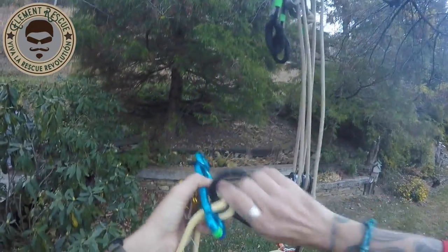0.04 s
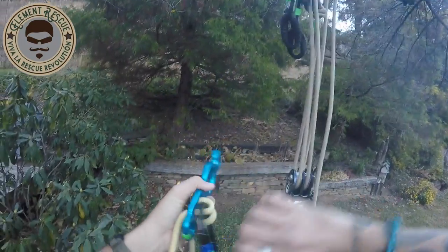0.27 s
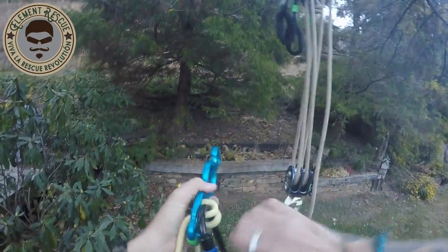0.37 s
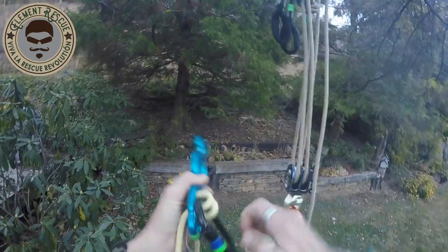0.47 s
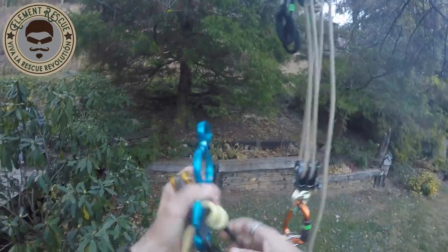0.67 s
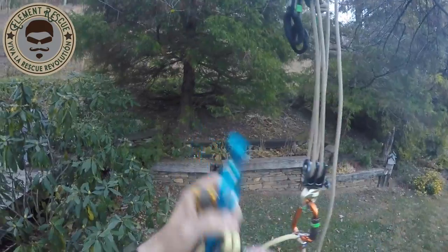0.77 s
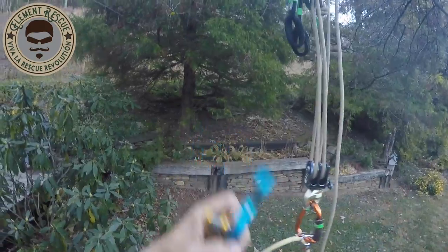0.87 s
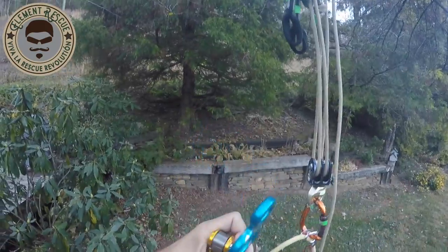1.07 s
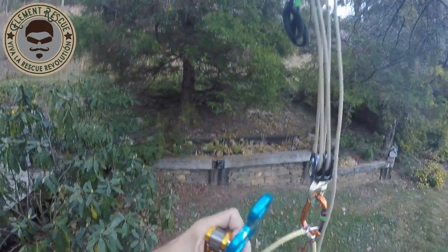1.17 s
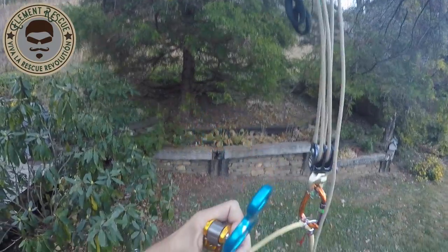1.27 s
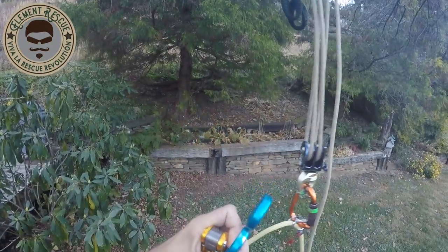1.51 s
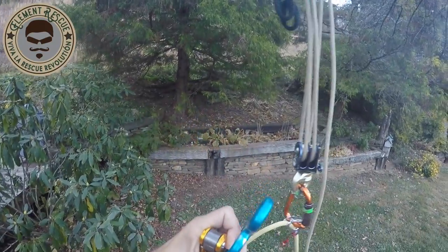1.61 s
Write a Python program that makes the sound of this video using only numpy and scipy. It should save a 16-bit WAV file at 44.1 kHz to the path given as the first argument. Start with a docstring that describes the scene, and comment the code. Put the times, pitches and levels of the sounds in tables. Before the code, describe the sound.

Sharp metallic carabiner snap, followed by smaller clinks and a dull clack, over faint rope rustle

```python
"""A carabiner's gate scrapes and snaps shut; the carabiner then knocks on a hand-held metal rope device.
Each strike superposes an impulsive tick, decaying noise and damped sinusoidal modes of the struck part.
Friction adds scrapes, squeaks and squeals; a weak scatter of decaying noise follows all the metal.
Filtered noise gives the rope's rustle and rasps, soft handling bumps, quiet outdoor air and a low
microphone rumble; a very faint pulsed whine comes from the camera's electronics."""
import sys
import numpy as np
from scipy import signal
from scipy.fft import rfft, irfft
from scipy.io import wavfile
from scipy.ndimage import uniform_filter1d

SR = 44100
rng = np.random.default_rng(int(sys.argv[2]) if len(sys.argv) > 2 else 0)


def bounce(signal):
    """Save signal as a 16-bit WAV file at the path given by the first command-line argument."""
    frames = np.transpose(np.atleast_2d(signal))
    limited = np.clip(frames, -1, 1)
    pcm = np.round(limited * 32767).astype(np.int16)
    wavfile.write(sys.argv[1], SR, pcm)


N = 72765  # samples


# Gate contacts, glancing then seating: t/s, crack level/dB, ring level/dB, treble tilt/(dB per octave),
# contact time/s, favoured f/Hz, tick level/dB
GATE_CONTACTS = [(.2486, -16.5, -35.5, -0.5, 0.0023, 9260, -25), (.2550, -13, -8.5, 0, 0.0012, 10680, -19)]
# Modes of the carabiner: f/Hz, level/dB, t60/s
CARABINER_MODES = [(600, -27.5, 0.02244), (744, -29.5, 0.035), (1200, -25, 0.03), (1513, -23, 0.025),
                   (1806, -28, 0.029), (2144, -20.5, 0.025), (2850, -20, 0.035), (3170, -20.5, .024),
                   (3630, -16.5, .026), (4090, -9.5, 0.02), (4250, -15, 0.025), (4500, -24, 0.012),
                   (4800, -9.5, 0.013), (5240, -14.5, 0.022), (7670, -35, .06), (8300, -23, .028),
                   (10600, -20, 0.033), (10870, -24, 0.021), (10800, -18, .04), (11500, -29, .032),
                   (12850, -23, .045), (12700, -35, .04)]
# Spectrum of the snap's crack: f/Hz, level/dB
SNAP_SPECTRUM = [(150, -35.5), (550, -18.5), (2000, -12), (3500, -11.5), (4200, 2.5), (5300, -18.5),
                 (6000, -7.5), (7300, -12), (8300, -0.5), (9700, -8), (10800, 2.5), (13200, 0.5),
                 (13850, -10), (14700, 2), (15400, -9.5)]


def gate_snaps():
    """Impact excitation: the closing gate sets the carabiner's modes ringing."""
    return strikes(GATE_CONTACTS, CARABINER_MODES, SNAP_SPECTRUM,
                   crack_t60_s=0.0093, wash_db=-17, wash_t60_s=0.075)


# Carabiner against rope device: t/s, crack level/dB, ring level/dB, treble tilt/(dB per octave),
# contact time/s, favoured f/Hz, tick level/dB
DEVICE_CONTACTS = [(.3439, -30, -28.5, 3.5, 0.00063, 5670, -31), (.4092, -64, -55.5, 3, 0.0009, 5460, -75),
                   (.6363, -30.5, -32.5, 3, 0.00092, 5050, -31),
                   (.6447, -36, -34.5, 3.5, 0.0012, 4460, -60),
                   (.8181, -48, -47.5, -0.5, 0.00087, 5600, -63), (.8893, -57, -57, -5, .003, 3820, -67),
                   (.9025, -59.5, -67, -3, 0.0017, 3800, -68)]
# Modes of the rope device: f/Hz, level/dB, t60/s
DEVICE_MODES = [(2700, -14, .018), (3135, -6, .03), (3390, -10, .033), (4295, -11, .02), (4595, -13, .075),
                (5110, -6, .02), (5470, -6, .022), (5485, -21, .085), (7526, -14, .034), (8040, -20, .085),
                (9120, -24, .03), (11350, -28, .05), (12960, -25, .04), (14640, -24, .025)]
# Spectrum of a knock's crack: f/Hz, level/dB
KNOCK_SPECTRUM = [(200, -26), (1000, -5.5), (1500, -6.5), (2000, -5.5), (2700, 0.5), (3700, -16), (4500, 5),
                  (5600, 0.5), (6900, -18.5), (7700, -5), (9000, -7), (10500, -16.5), (11400, -10.5),
                  (13000, -16), (14800, -19), (15500, -34)]


def device_knocks():
    """Impact excitation: the carabiner's blows set the rope device's modes ringing."""
    return strikes(DEVICE_CONTACTS, DEVICE_MODES, KNOCK_SPECTRUM,
                   crack_t60_s=0.019, wash_db=-31, wash_t60_s=0.074)


# Dull clacks of the side plate: t/s, crack level/dB, ring level/dB, treble tilt/(dB per octave),
# contact time/s, favoured f/Hz, tick level/dB
PLATE_CONTACTS = [(.7636, -35, -32, 0, .0007, 5650, -30), (.7665, -41, -39, -2, .001, 1250, -42)]
# Modes of the side plate, damped by the hand: f/Hz, level/dB, t60/s
PLATE_MODES = [(830, -14.5, 0.029), (1007, -2.5, 0.0071), (1264, -10.5, 0.031), (1810, -14, 0.022),
               (2110, -9.5, 0.016), (3325, -14.5, 0.041), (5600, -6, 0.0091), (6070, -2, 0.016)]
# Spectrum of a clack's crack: f/Hz, level/dB
CLACK_SPECTRUM = [(250, -22), (550, -12), (1200, 0), (2600, -17), (4300, -6), (5800, -2.5), (7000, -23),
                  (8600, -3), (12000, -12.5), (14600, -7), (15400, -20)]


def plate_clacks():
    """Damped modal response: the hand-held side plate clacks with short-lived modes."""
    return strikes(PLATE_CONTACTS, PLATE_MODES, CLACK_SPECTRUM,
                   crack_t60_s=0.016, wash_db=-16, wash_t60_s=0.081)


# Wash of dense high modes, which outlast the low ones: f/Hz, level/dB
WASH_SPECTRUM = [(500, -12), (1500, -18), (4500, -1.5), (6500, -3), (8000, -2), (10000, -5.5), (12300, 1.5),
                 (14000, -8), (15400, -7)]
RISE_S = 0.00023


def strikes(contacts, modes, spectrum, crack_t60_s, wash_db, wash_t60_s):
    """Superposition at impact: tick, crack of chattering faces, wash of dense modes, and main modes."""
    out = np.zeros(N)
    t = np.arange(8192) / SR
    bins = np.fft.rfftfreq(len(t), 1 / SR)
    for s, crack_db, ring_db, tilt_db, contact_s, favoured_hz, tick_db in contacts:
        chatter, dense = rng.standard_normal((2, len(t)))
        contact_spectrum = read(spectrum, bins) + emphasis(bins, tilt_db, favoured_hz)
        # The crack holds level during contact, then decays
        crack = shaped(chatter, contact_spectrum) * fade(t - contact_s, crack_t60_s)
        wash = shaped(dense, read(WASH_SPECTRUM, bins)) * fade(t, wash_t60_s)
        ring = np.zeros(len(t))
        for k, (hz, db, t60_s) in enumerate(modes):
            sign = (-1) ** k  # neighbouring modes start in opposite phase
            gain = amp(db + emphasis(hz, tilt_db, favoured_hz))
            ring += sign * gain * fade(t, t60_s) * np.sin(2 * np.pi * hz * t)
        onset = np.minimum(t / RISE_S, 1)
        noise_part = amp(crack_db) * (crack + amp(wash_db) * wash)
        add(out, s, onset * (noise_part + amp(ring_db) * ring))
        add(out, s + RISE_S, amp(tick_db) * tick(contact_spectrum))
    return out


FAVOUR_DB, FAVOUR_WIDTH_HZ = 6.5, 300


def emphasis(hz, tilt_db, favoured_hz):
    """Selective excitation: each contact point tilts the spectrum and favours one region, in dB."""
    octaves = np.log2(np.maximum(hz, 500) / 6000)  # the tilt pivots at 6 kHz and is flat below 500 Hz
    favour = np.exp(-((hz - favoured_hz) / FAVOUR_WIDTH_HZ) ** 2)
    return tilt_db * octaves + FAVOUR_DB * favour


def tick(gain_db):
    """Minimum-phase impulse: the given spectrum's energy arrives as early as possible; peak 1."""
    two_sided_db = np.concatenate([gain_db, gain_db[-2:0:-1]])
    log_gain = np.log(amp(two_sided_db))
    # The Hilbert transform of the log gain gives the minimum phase
    response = np.exp(np.conj(signal.hilbert(log_gain)))
    pulse = irfft(response[:len(gain_db)])
    return pulse / np.max(abs(pulse))


# Gate sliding on metal: t/s, Gaussian decay time/s, rasp level/dB, squeak level/dB
GATE_SLIPS = [(0.2185, 0.0056, -44, -45), (.2240, .004, -44.5, -54), (0.2283, .006, -43, -38.5),
              (0.2324, 0.0045, -51, -35.5)]
# Spectrum of the gate's rasp: f/Hz, level/dB
SCRAPE_SPECTRUM = [(300, -22), (1350, 9.5), (2000, -3), (5000, -3), (6500, -19), (8200, -8.5), (10000, 3),
                   (12500, -7), (15000, 1.5)]
SQUEAK_HZ, SQUEAK_T60_S, SCRAPE_RISE_S = 4850, 0.014, 0.0006


def gate_scrapes():
    """Sliding friction: each short slip of the gate gives a noise rasp and a decaying squeak."""
    out = np.zeros(N)
    t = np.arange(2048) / SR
    onset = np.minimum(t / SCRAPE_RISE_S, 1)
    for s, length_s, db, squeak_db in GATE_SLIPS:
        rasp = amp(db) * noise(SCRAPE_SPECTRUM, len(t)) * np.exp(-(t / length_s) ** 2)
        squeak = amp(squeak_db) * np.sin(2 * np.pi * SQUEAK_HZ * t) * fade(t, SQUEAK_T60_S)
        add(out, s, onset * (rasp + squeak))
    return out


# Metal rubbing before the next strike: t/s, length/s, f/Hz, peak level/dB
METAL_SQUEALS = [(.588, 0.04, 6700, -74), (0.689, 0.07, 6320, -66.5)]
SQUEAL_WANDER_HZ = 25.1


def squeals():
    """Frictional oscillation: rubbing metal gives thin tones of slightly unsteady pitch."""
    out = np.zeros(N)
    for s, length_s, hz, db in METAL_SQUEALS:
        u = np.arange(0, length_s, 1 / SR) / length_s
        pitch = hz + SQUEAL_WANDER_HZ * drift(N, count=200)[:len(u)]
        swell = np.sin(np.pi * u ** 2) ** .5  # swells slowly, peaks late
        add(out, s, amp(db) * swell * np.sin(2 * np.pi * np.cumsum(pitch) / SR))
    return out


ECHO_DB, ECHO_T60_S, ECHO_DELAY_S = -33, 0.36, 0.006


def yard(x):
    """Diffuse scattering: ground and bushes return a weak, delayed, exponentially decaying tail."""
    t = np.arange(SR // 2) / SR
    arrival = np.clip(t / ECHO_DELAY_S - 1, 0, 1)  # silent for one delay, then grows over another
    tail = rng.standard_normal(len(t)) * fade(t, ECHO_T60_S) * arrival
    return amp(ECHO_DB) * signal.fftconvolve(x, tail / np.linalg.norm(tail))[:N]


# Rope sliding through the hand: t/s, level/dB
ROPE_LEVEL = [(0, -66.5), (0.151, -63.5), (.3, -69), (.45, -64.5), (.58, -66.5), (.85, -62.5), (1.15, -67),
              (1.32, -67), (1.42, -62.5), (1.52, -63), (1.65, -60.5)]
# Spectrum of the rope's rustle: f/Hz, level/dB
ROPE_SPECTRUM = [(100, -23), (220, -2.5), (340, 3.5), (480, -1), (700, 1), (1050, -2), (1400, -25),
                 (5000, -12.5), (15000, -71)]
ROPE_GRAIN_DB = 1.5


def rope():
    """Amplitude-modulated friction noise: the sliding sheath gives a soft, grainy rustle."""
    level_db = np.interp(np.arange(N) / SR, *np.transpose(ROPE_LEVEL))
    grain = amp(ROPE_GRAIN_DB * drift(N, count=200))
    return amp(level_db) * unit(noise(ROPE_SPECTRUM, N) * grain)


# Rope settling against the metal: t/s, Gaussian decay time/s, level/dB
ROPE_RASPS = [(0.29, 0.02, -61), (.3135, 0.0032, -52), (.3200, .004, -50)]
# Spectrum of a rasp: f/Hz, level/dB
RASP_SPECTRUM = [(1000, -10), (6000, -9), (8000, 1), (12500, -1), (15000, -5)]


def rasps():
    """Transient friction noise: the rope's sheath brushes the metal briefly and thinly."""
    out = np.zeros(N)
    t = np.arange(2048) / SR
    onset = np.minimum(t / SCRAPE_RISE_S, 1)
    for s, length_s, db in ROPE_RASPS:
        add(out, s, amp(db) * noise(RASP_SPECTRUM, len(t)) * onset * np.exp(-(t / length_s) ** 2))
    return out


# Soft handling bumps: t/s, level before the envelope/dB
HAND_BUMPS = [(.298, -45.5), (.492, -41.5), (0.605, -42.5), (0.807, -46), (1.005, -43), (1.206, -42),
              (1.424, -47.5)]
# Spectrum of a bump: f/Hz, level/dB
BUMP_SPECTRUM = [(20, -4.5), (50, 5), (90, -8), (180, -16), (400, -32), (1500, -64)]
BUMP_PEAK_S = 0.01


def bumps():
    """Low-frequency handling noise: moving hands nudge the microphone with dull, low pulses."""
    out = np.zeros(N)
    t = np.arange(8192) / SR
    envelope = t / BUMP_PEAK_S * np.exp(-t / BUMP_PEAK_S)
    for s, db in HAND_BUMPS:
        add(out, s, amp(db) * noise(BUMP_SPECTRUM, len(t)) * envelope)
    return out


# Spectral density of outdoor air and microphone rumble: f/Hz, relative level/dB
AIR_SPECTRUM = [(12, -28.5), (20, -5.5), (55, 0.5), (86, -12), (301, -19), (422, -29), (485, -24.5),
                (976, -25), (2020, -28.5), (9670, -39.5), (10500, -40), (14700, -42.5), (16000, -47)]
AIR_DB, RUMBLE_SWAY_DB, RUMBLE_HZ = -57.5, 1, 130


def air():
    """Broadband ambient noise: a steady hush whose low rumble is modulated into small lumps."""
    hush = noise(AIR_SPECTRUM, N)
    low_pass = signal.butter(2, RUMBLE_HZ, fs=SR, output="sos")
    low = signal.sosfiltfilt(low_pass, hush)
    sway = amp(RUMBLE_SWAY_DB * drift(N, count=1500))
    rumble = np.std(low) * unit(low * sway)
    return amp(AIR_DB) * (hush - low + rumble)


WHINE_HZ, WHINE_DB, WHINE_WANDER_HZ = 10280, -73.5, 12
WHINE_PULSES_PER_S, WHINE_FIRST_S = 23.976, 0.014  # the second is the middle of the first pulse


def whine():
    """Gated tone: the camera's electronics whine faintly, on and off at a steady rate."""
    hz = WHINE_HZ + WHINE_WANDER_HZ * drift(N, count=400)
    tone = unit(np.sin(2 * np.pi * np.cumsum(hz) / SR))
    since_first_s = np.arange(N) / SR - WHINE_FIRST_S
    on = np.cos(2 * np.pi * WHINE_PULSES_PER_S * since_first_s) > 0
    gate = uniform_filter1d(on * 1., size=90)  # softened edges
    return amp(WHINE_DB) * gate * tone


def amp(db):
    """Logarithmic level: converts decibels to amplitude gain."""
    return 10 ** (np.asarray(db) / 20)


def unit(x):
    """Root-mean-square normalisation: scales to rms 1."""
    return x / np.sqrt(np.mean(x ** 2) + 1e-20)


def read(points, hz):
    """Logarithmic frequency scale: interpolates a spectrum in dB between its points."""
    f, db = np.transpose(points)
    return np.interp(np.log(hz + 1), np.log(f + 1), db)


def add(mix, s, sound):
    """Linear superposition: adds a sound into the mix, in place, from time s."""
    part = mix[round(s * SR):][:len(sound)]
    part += sound[:len(part)]


def shaped(x, gain_db):
    """Spectral filtering: weights each frequency by a gain in dB, then scales to rms 1."""
    return unit(irfft(rfft(x) * amp(gain_db), len(x)))


def noise(spectrum, size):
    """Coloured noise: white noise filtered to a spectrum, rms 1."""
    return shaped(rng.standard_normal(size), read(spectrum, np.fft.rfftfreq(size, 1 / SR)))


def drift(size, count):
    """Slow random modulation: noise smoothed twice over count samples, rms 1."""
    smooth = uniform_filter1d(rng.standard_normal(size), count)
    return unit(uniform_filter1d(smooth, count))


def fade(t, t60):
    """Exponential decay: falls by 60 dB in t60 seconds, level before t = 0."""
    return np.exp(-np.log(1000) * np.maximum(t, 0) / t60)


def scene():
    """Superposition of sources: metal with its scatter, rope, handling and background."""
    metal = gate_snaps() + device_knocks() + plate_clacks() + gate_scrapes() + squeals()
    foreground = metal + yard(metal) + rope() + rasps() + bumps()
    return (foreground + air() + whine())[None]


CEILING, EDGE_HZ = 1.0, 15200  # full-scale amplitude; upper band edge


def record(dry):
    """Saturation and band limiting: the camera rounds off high peaks, then removes the top treble."""
    rounded = CEILING * np.tanh(dry / CEILING)
    low_pass = signal.firwin(201, EDGE_HZ, window=("kaiser", 8), fs=SR)
    return signal.oaconvolve(rounded, low_pass[None], "same")


dry = scene()
out = record(dry)
bounce(out)
```